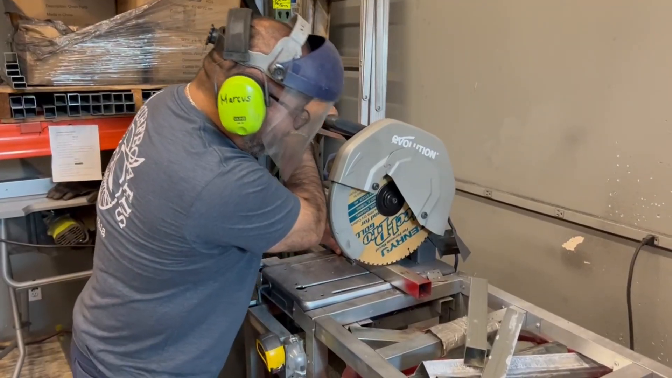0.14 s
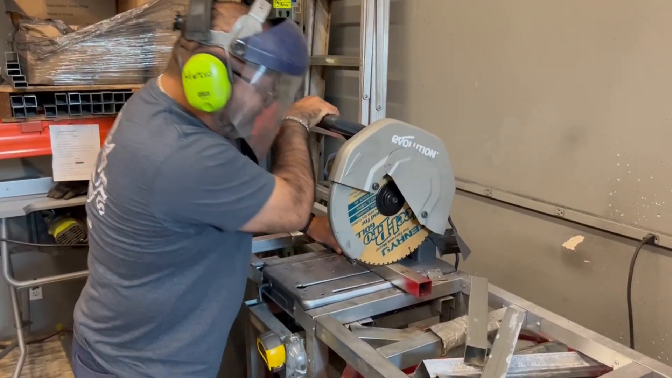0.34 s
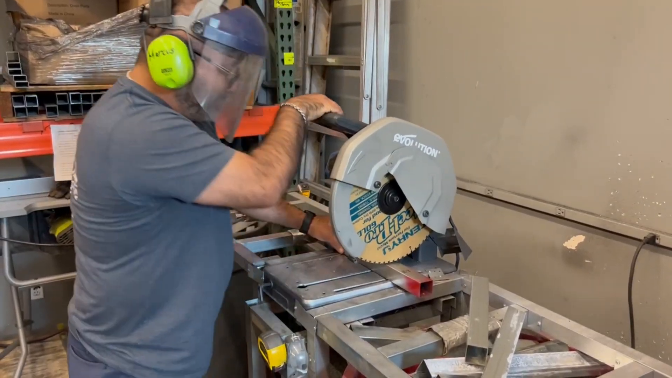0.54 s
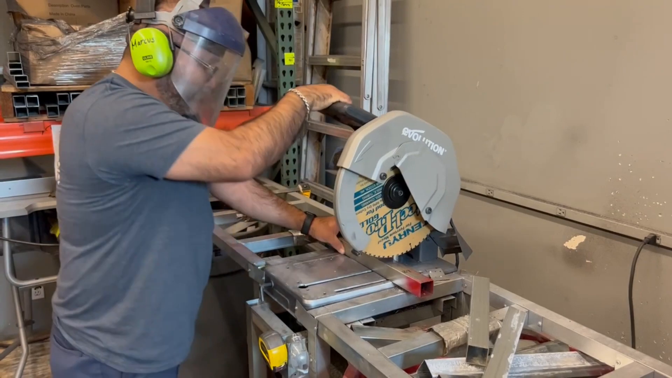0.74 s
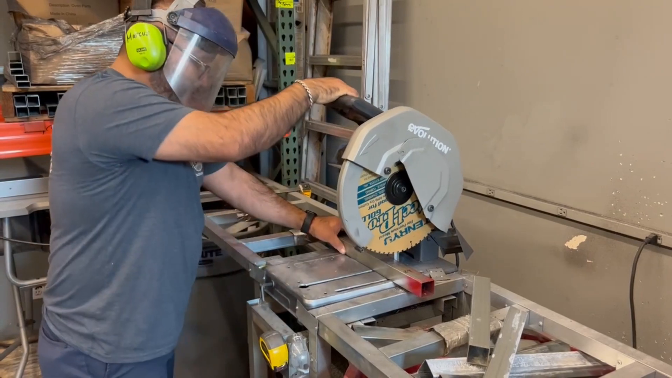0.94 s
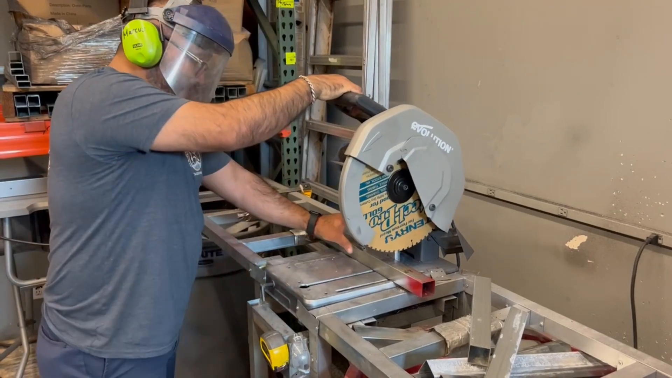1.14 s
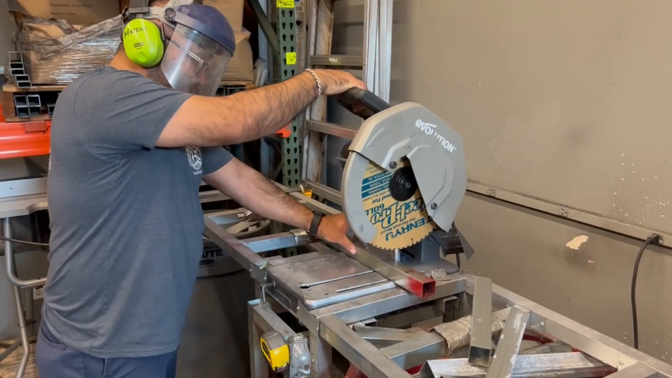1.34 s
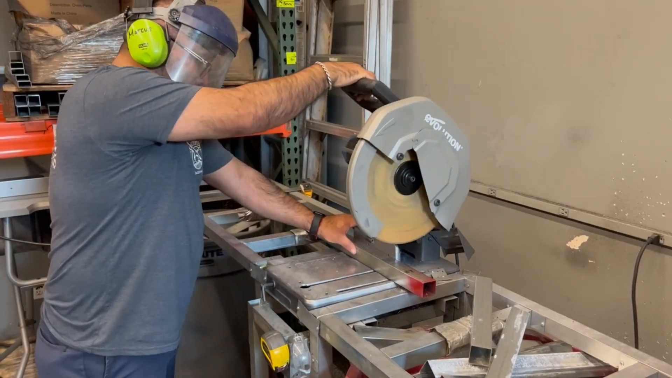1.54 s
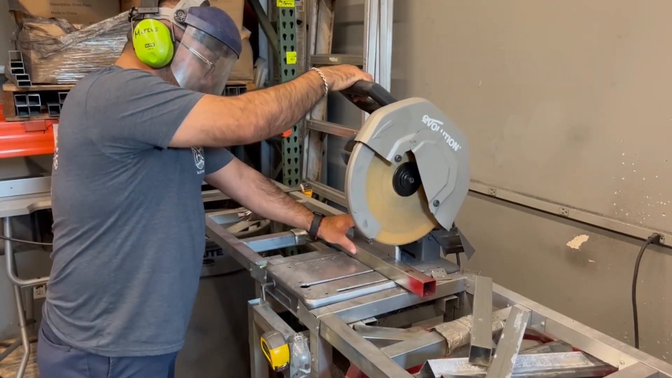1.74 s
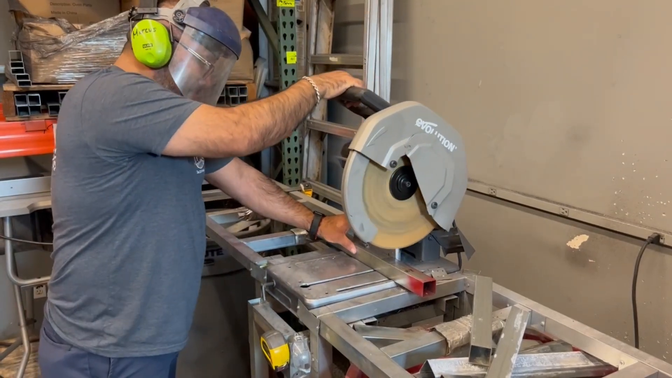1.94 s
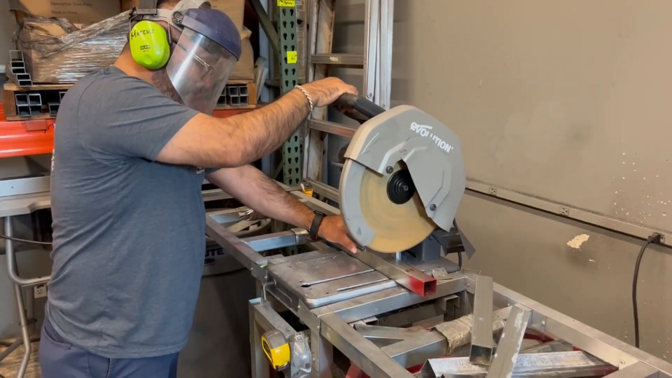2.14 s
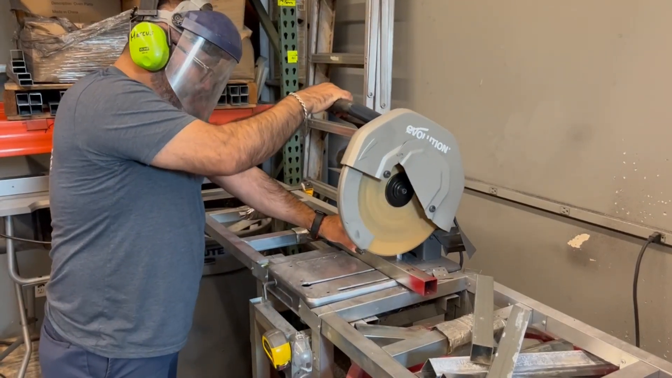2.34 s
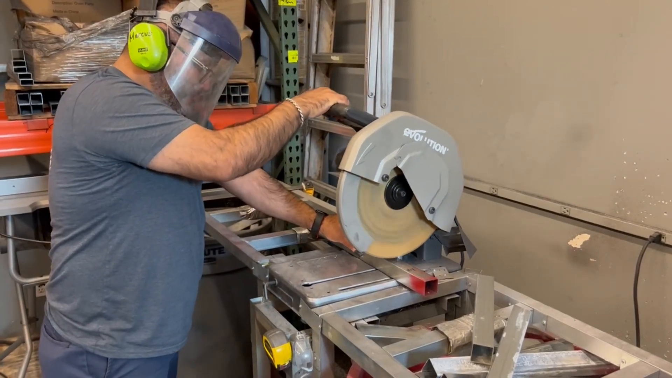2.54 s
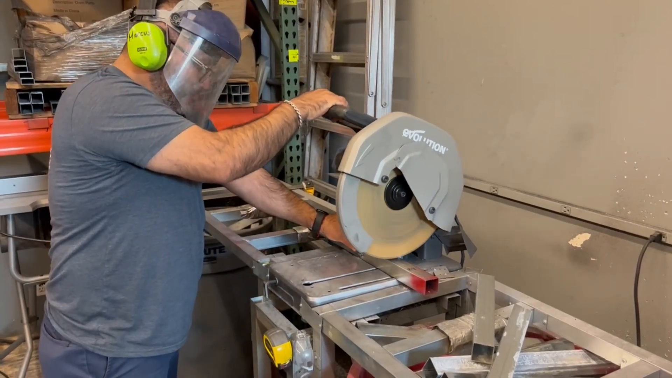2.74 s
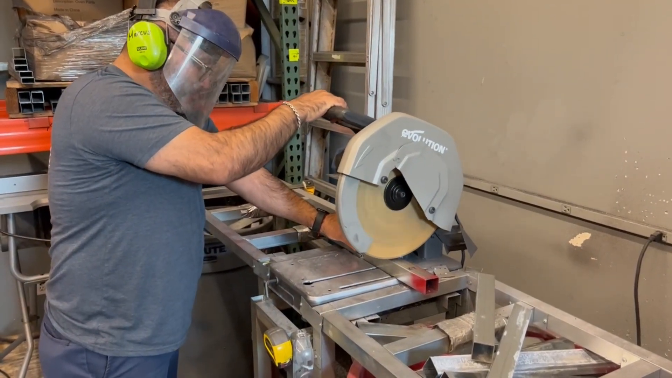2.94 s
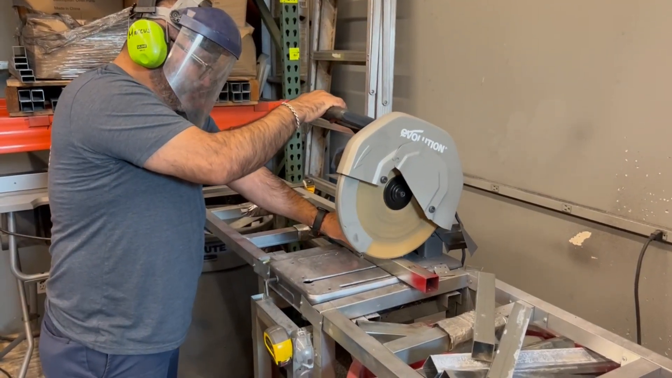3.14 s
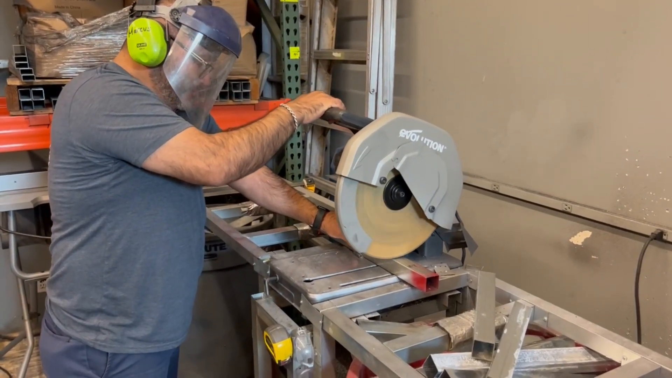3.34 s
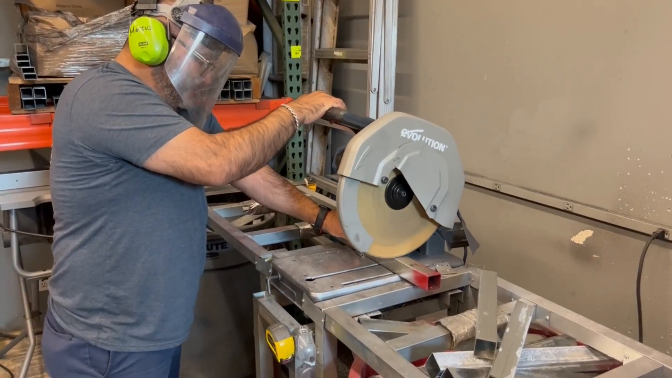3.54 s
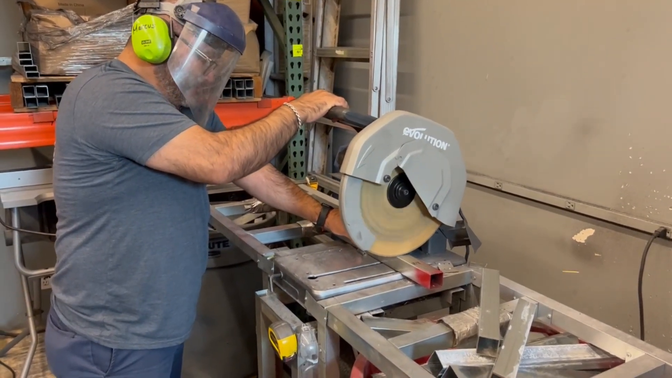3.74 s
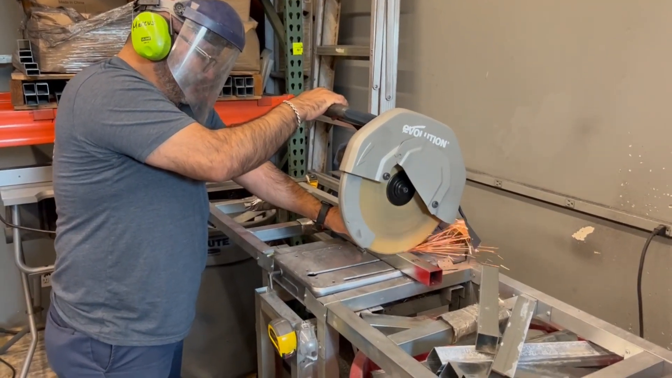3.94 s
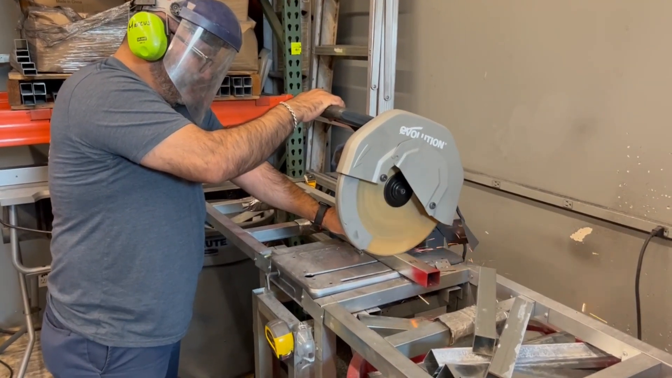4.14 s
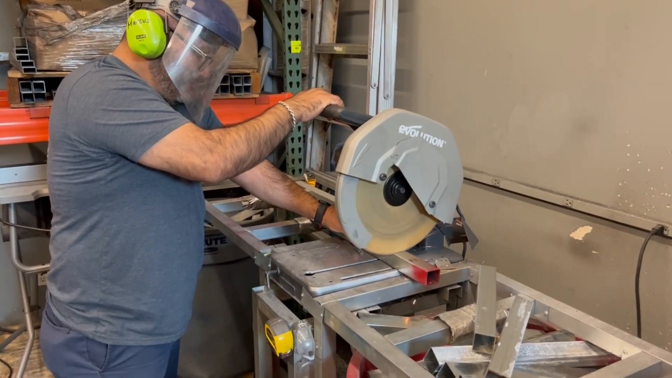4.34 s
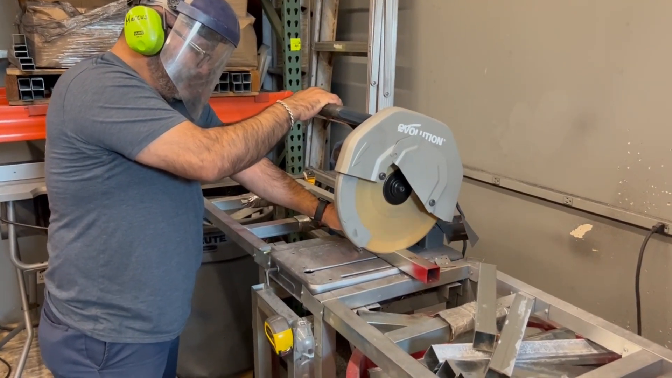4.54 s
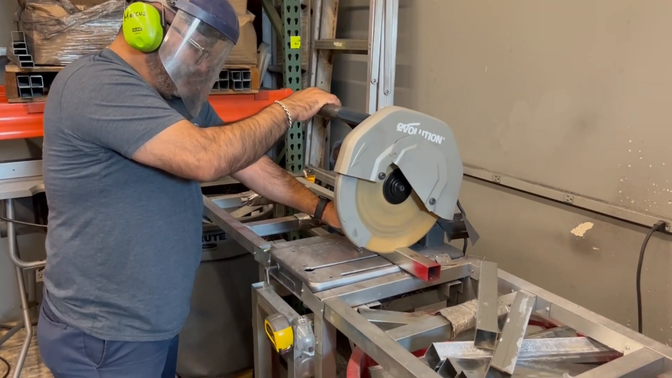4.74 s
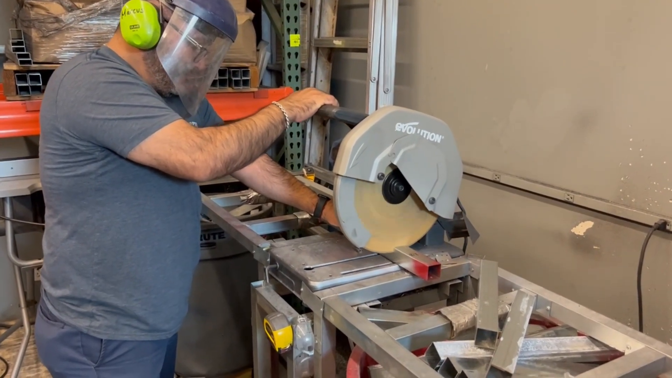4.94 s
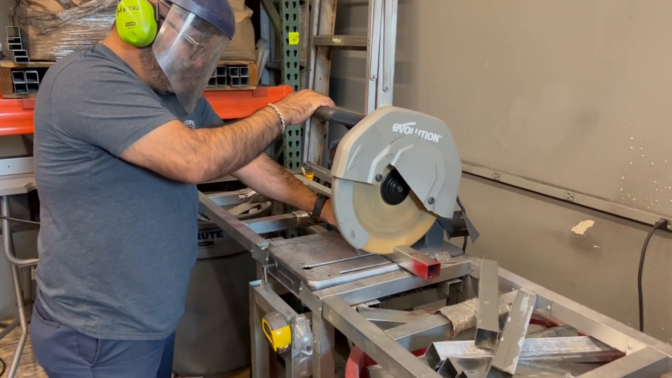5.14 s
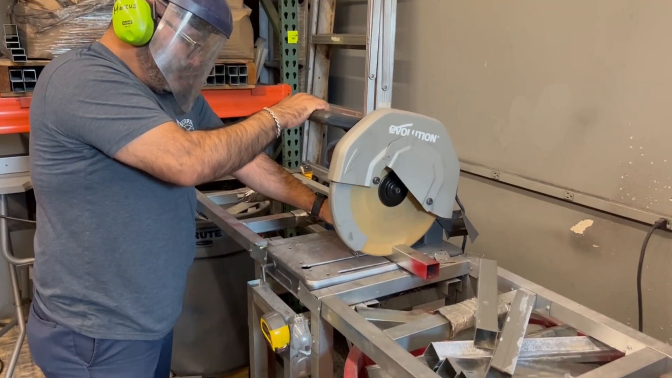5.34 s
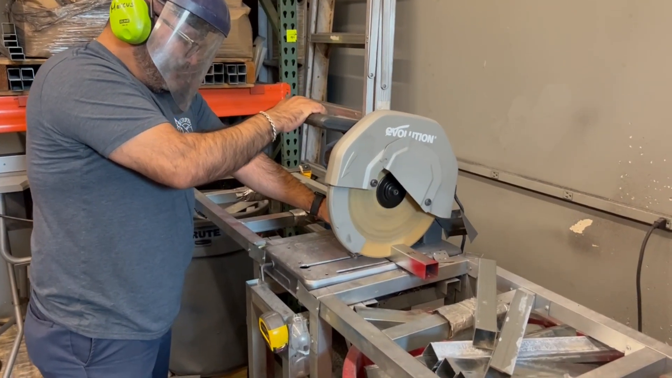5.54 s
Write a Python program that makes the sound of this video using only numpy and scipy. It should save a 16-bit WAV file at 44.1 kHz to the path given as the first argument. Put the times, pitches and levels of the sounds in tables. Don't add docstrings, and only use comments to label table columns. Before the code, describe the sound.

In a workshop, hands rub and knock a bench, a saw motor spins up, its blade screeches through steel, then heavy knocks and a thinner whirring.

```python
import sys
import numpy as np
from scipy import signal
from scipy.fft import rfft, irfft, next_fast_len
from scipy.io import wavfile
from scipy.ndimage import uniform_filter1d

SR = 44100
rng = np.random.default_rng(int(sys.argv[2]) if len(sys.argv) > 2 else 0)


def field_ratio(decibels):
    return 10 ** (np.asarray(decibels, dtype=float) / 20)


def bounce(signal):
    frames = np.transpose(np.atleast_2d(signal))
    limited = np.clip(frames, -1, 1)
    pcm = np.round(limited * 32767).astype(np.int16)
    wavfile.write(sys.argv[1], SR, pcm)


N = 245932
TIME = np.arange(N) / SR
PADDED = next_fast_len(N + 8192)
JOLT_S, BITE_S, THROUGH_S = 1.362, 3.492, 4.872

HUM_DB, ROOM_HUM = -63, [(12, -63), (20, -25), (34, -5), (59, 13), (92, 2.5), (231, -11), (300, -41),
                         (390, -47), (660, -120)]

# t/s, peak level/dB, brightness/dB per octave
TAPS = [(0.134, -48, 15), (0.29, -42.5, 7.5), (0.307, -51, 13), (0.342, -46, 9), (0.543, -29.5, 1.5),
        (0.597, -63, 5), (0.614, -44.5, 7.5), (0.679, -45.5, 4), (0.719, -55, 3), (0.771, -47, 0),
        (0.79, -60, 9), (0.806, -54, -4), (0.838, -46.5, 1), (0.9, -47, 4), (0.949, -39, 8), (1.09, -54, 8),
        (1.282, -49, 4)]
# f/Hz, level/dB, time to fall 60 dB/s
BENCH_MODES = [(392, -7, 0.2), (477, -26, 0.157), (570, -6, 0.06), (649, 0.5, 0.1), (810, -16, 0.13),
               (1171, -13, .08), (1605, -10, 0.047), (2032, -11.5, .04), (3140, -24, .04), (5430, -45, .05)]
TAP_CUT_HZ = 340
TAP_RISE_T60_S, TAP_SPREAD_DB = .025, 3

# start t/s, fullest t/s, level/dB, dying/dB per s, brightness/dB
SCUFFS = [
    (0.0, 0.18, -51, 138, -6.5),
    (0.29, 0.304, -48.5, 97, -12),
    (0.307, 0.3, -53.5, 107, 2),
    (0.335, 0.345, -51, 110, -3.5),
    (0.54, 0.56, -48, 108, -14.5),
    (0.773, 1.02, -53, 100, -13),
    (0.898, 0.95, -42.5, 156, -3),
    (1.06, 1.1, -66, 89.5, -3.5),
    (1.2, 1.2, -71.5, 150, 4.5),
    (1.281, 1.29, -59.5, 151.5, 2),
]
# f/Hz, level/dB, share of brightness, share of dying, floor level/dB
SCUFF_REGISTERS = [(690, 7, 0, 1.04, -84), (2700, 1, 1.5, 1.26, -88), (7900, -8, 1.5, 1.18, -90.5),
                   (12000, -16, 3, 1.6, -100)]
SCUFF_SWELL_DB = 6
# f/Hz, width/Hz, level/dB, hand lets go t/s
CLAMP_MODES = [(980, 65, -13, 1.4), (1470, 130, 2, 1.3), (1920, 200, 1.5, 1.4), (2640, 400, 0, 0.34),
               (2600, 140, 5, 0.34), (2840, 45, -3, .33), (3180, 30, -11, 1.4), (802, 40, -7, 1.4),
               (1180, 40, -3, 1.4)]

# t/s, level/dB, first sweep time/s, dying time/s
KNOCKS = [
    (4.619, -30, 0.00413, 0.027),
    (4.711, -23, 0.0048, 0.02),
    (4.744, -15.5, 0.00236, 0.029),
    (4.757, -17, 0.0027, 0.014),
    (4.785, -16, 0.0017, 0.024),
    (4.799, -15, 0.0021, 0.0089),
    (4.837, -24, 0.00218, 0.022),
    (4.8716, -4.5, 0.00062, 0.02),
]
# t/s, level/dB
RUMBLE = [
    (4.59, -36),
    (4.63, -35),
    (4.682, -51),
    (4.71, -25),
    (4.794, -12),
    (4.904, -29),
    (4.95, -67),
]
SHUDDER_DB = -9
# t/s, level/dB, f/Hz, fullest after/s
SWAY = (4.78, -13, 55, .024)
DUCK_DB, DUCK_RELEASE_S = -12, 0.13

# t/s, level/dB, brightness/dB
ROAR = [(1.349, -63, -7), (1.356, -27.5, 1.5), (1.367, -28.5, 1), (1.457, -25, -9.5), (1.56, -23.5, -10),
        (1.84, -20, -8.5), (2.03, -19, -7), (2.54, -21, -4), (2.79, -22.5, -2.5), (3.48, -23, -2),
        (3.67, -22.5, -1.5), (4.07, -23, 0.5), (4.22, -21.5, 5.5), (4.48, -23, 7), (4.71, -23, 13.5),
        (4.87, -23.5, 9), (5.05, -26, 14), (5.58, -29.5, 14)]
# f/Hz, level/dB
ROAR_SHAPE = [(40, -36), (90, -10.5), (180, -14), (350, 0.5), (700, 0.5), (1500, -1.5), (3000, -3),
              (6000, -3.5), (9000, -3.5)]
# f/Hz, level/dB, share of brightness, level added by chips/dB
REGISTERS = [(340, 3.5, -0.32, 0), (1176, 11, -0.61, -0.1), (3990, 11, -0.15, 2.5), (6870, 7.5, 0.32, -0.2),
             (12000, -14.5, 0.57, 3.5)]
# f/Hz, width/Hz, level/dB
HOUSING = [(615.8, 16, 4.5), (840, 97, -10.5), (1587, 15, -0.5), (1941, 31, -3.5)]
LOW_LAG_DB, LOW_LAG_S = -10, .25
TOP_LOST_DB, TOP_LOST_S = -19, 0.046
SPLIT_HZ, SPLIT_WIDTH_HZ, TOP_TILT_DB_PER_OCT = 11000, 250, -10

# f/Hz, width/Hz, level/dB, time to fall 60 dB/s
JOLT = [(119.2, 2.84, -31, 1.2), (374, 38, -24.5, 0.46), (440, 55, -23.5, 4.3), (597, 22, -25.5, 1.9),
        (806, 110, -28.5, 0.78), (2140, 44, -35, 1.4), (4840, 230, -23, 0.35)]
# f/Hz, width/Hz, level/dB, t/s, lasting time/s
RATTLES = [
    (2130, 110, -26, 1.47, 0.026),
    (3380, 220, -23, 1.98, 0.028),
    (1750, 130, -25, 1.57, .03),
    (3020, 710, -23.5, 2.16, 0.17),
    (2960, 510, -26, 2.52, 0.12),
]
# t/s, once a turn level/dB, twice a turn level/dB
ROTOR = [
    (1.5, -43, -44),
    (1.8, -41.5, -64.5),
    (2.5, -33.5, -50),
    (3.2, -36.5, -34),
    (3.9, -36.5, -34),
    (4.5, -43, -72),
    (4.86, -50, -65),
    (4.9, -43.5, -47.5),
    (5.58, -43, -57),
]
# multiple of the rotor, level/dB, loudest t/s, lasting time/s
GEAR = (20.7, -30, 1.555, .03)
# t/s, blade rate f/Hz, tone level/dB
FAN = [(1.36, 1306, -57), (1.5, 2094, -25), (1.55, 2435, -33), (1.59, 2693, -31), (1.68, 3090, -33),
       (1.705, 3189, -24.5), (1.8, 3464, -23.5), (1.85, 3586, -29), (1.91, 3740, -23.5), (1.99, 3873, -29),
       (2.06, 3960, -24.5), (2.12, 4065, -29), (2.2, 4174, -25.5), (2.35, 4293, -20), (2.6, 4510, -29),
       (2.85, 4644, -24), (3.22, 4766, -22), (3.3, 4785, -34), (3.5, 4856, -37), (3.915, 4793, -35),
       (3.95, 4793, -23.5), (4.14, 4700, -24), (4.45, 4604, -32), (4.86, 4653, -35)]
# t/s, beat rate f/Hz
BEAT = [(1.36, 70), (2.0, 55), (2.35, 33), (2.6, 24), (2.81, 16.5), (2.88, 12.5), (2.97, 11), (3.06, 10)]
BEAT_S, BEAT_DB, FAN_FREED_DB = 3.11, 4, -16
NULL_HZ, NULL_WIDTH_HZ, NULL_DB = 3810, 35, -9
WHINE_ROUGH_DB, WHINE_CLEARS_DB_PER_S = -1, 8
WHINE_TWICE_DB = -15
WHINE_BURIED_DB, WHINE_EMERGES_S = -11, .2

# f/Hz, width/Hz, level/dB, loudest t/s, lasting time/s
SINGING = [(684, 2.5, -29.5, 3.82, 0.096), (690, 2.5, -24.5, 4.08, 0.048), (680, 2.5, -27.5, 4.22, 0.092),
           (686, 2.5, -37.5, 4.4, 0.15), (1460, 3.3, -23.5, 3.93, 0.075), (1457, 3.3, -24.5, 4.14, 0.042),
           (1453, 3.3, -27, 4.32, 0.053), (1463, 3, -35, 4.55, 0.16), (2070, 5.1, -29.5, 4.38, 0.099),
           (2370, 4.1, -30.5, 4.18, 0.14), (2450, 12, -33, 3.85, 0.14), (2480, 21, -45, 3.54, 0.24),
           (1680, 8.7, -27, 4.155, 0.21), (3725, 28, -31, 4.2, 0.24), (4120, 30, -26, 4.06, 0.045),
           (4900, 11.4, -32, 4.64, 0.158), (5180, 20, -30.5, 4.25, 0.275), (4510, 10, -29, 4.58, 0.062),
           (5418, 11, -30.5, 4.46, 0.66), (5520, 71, -27, 4.18, 0.17), (6950, 15.3, -33, 4.16, 0.17),
           (6660, 30.6, -46, 4.8, 0.17), (7000, 39, -28.5, 4.24, 0.19), (8060, 28, -43, 4.5, 0.18),
           (8777, 25, -29.5, 4.262, 0.19)]
# t/s, pair rate f/Hz
PAIR_RATE = [(3.492, 822), (3.7, 822.5), (4.0, 811), (4.12, 799), (4.25, 796), (4.4, 790.8), (4.55, 791.4),
             (4.7, 794.4), (4.85, 797.3), (5.0, 799.2), (5.15, 800.2), (5.58, 800.5)]
# t/s, share of pitch
WANDER = [(3.47, .004), (4.1, .004), (4.4, .0015), (4.9, .0003), (5.58, .0003)]
# multiple of the pair rate, level/dB
TEETH = [(1, -40), (2, -42.5), (3, -37.5), (4, -33.5), (5, -33.5), (6, -32.5), (7, -35.5), (8, -33.5),
         (9, -41), (10, -33), (11, -40.5), (12, -31.5), (13, -39), (14, -34.5), (16, -40), (18, -45)]
# t/s, even multiples level/dB, their brightness/dB per octave, odd multiples level/dB
CUT = [
    (3.492, 0, -22, 5.5),
    (3.6, 0.5, -5, 0),
    (3.78, 3, -7, 4),
    (4.1, -2.5, -1, 3),
    (4.35, 5.5, -15, -1.5),
    (4.55, -5, 7.5, -6),
    (4.8, 3.5, 7, -7),
    (5.05, 0.5, 6, -28),
    (5.58, -1.5, 5.5, -19),
]
# multiple of the pair rate, level/dB, loudest t/s, lasting time/s
SQUEALS = [(2, -31, 3.9, 0.045), (4, -33, 4.05, 0.12), (2, -39, 3.9, 0.1), (4, -31.5, 4.31, 0.094),
           (2, -31, 4.35, 0.05), (4, -32, 4.56, 0.1), (14, -29, 4.55, 0.072), (6, -38, 4.7, 0.13),
           (10, -31, 4.74, 0.054), (4, -38, 4.85, 0.028), (6, -25, 5.186, 0.19), (5, -34, 3.505, 0.022),
           (5, -34, 3.57, 0.04), (5, -35, 3.72, 0.053), (5, -35, 4.05, 0.06), (7, -33.5, 3.5, 0.012),
           (6, -35, 4.48, 0.15), (8, -31, 5.49, 0.06), (8, -35, 5.02, 0.048), (8, -34, 5.25, .07),
           (4, -40, 5.14, .06), (4, -41, 5.3, .05), (10, -29.5, 5.2, 0.14), (12, -36, 5.04, 0.052),
           (12, -28, 4.45, 0.16), (4, -30, 3.53, 0.038), (2, -30, 5.225, 0.087), (4, -37, 5.52, 0.08)]
HIGH_TEETH_LOST_DB = -23.5
# most at t/s, lasting time/s, sharpness, gained level/dB
HIGH_TOOTH = (3.84, .26, 1.2, 4.5)
BEADED = {4: 1.6, 5: 0, 7: .3}
# t/s, depth 0-1
THROB = [(3.49, 0.56), (4.0, 0.37), (4.3, 0.21), (4.6, 0.4), (4.9, 0.27), (5.58, 0.21)]
THROB_TOP = 5

# f/Hz, likeness 0-1
LIKENESS = [(60, .99), (240, .95), (480, .88), (950, .66), (1900, .72), (3800, .45), (6500, .8), (8400, .9),
            (15000, .97)]
# f/Hz, lead/rad
LEAD = [(100, -0.026), (1980, 0.44), (3100, 0.83), (3960, 0.56), (4650, 0.79), (6500, 0.95)]
# f/Hz, lead/rad
TREBLE_LEAD = [(8400, 0), (10200, -3.14), (12000, -6.28), (13750, -9.42), (15500, -12.57), (17000, -15.2)]
# f/Hz, level/dB
LOUDER = [(60, 0), (120, -0.5), (240, 0.5), (480, -0.5), (950, -3), (1890, -1.0), (3770, 3), (7520, 0.0),
          (15000, -2.5)]
SHOP_T60_S, SHOP_DB = .35, -11.5
# t/s, f/Hz, level/dB
BASS_CUT = (5.085, 900, -10)
# from f/Hz, swing/Hz, to f/Hz, swing/Hz
TREBLE_GAPS = [
    [(9760, 60, 10650, 220), (13050, 220, 14400, 250), (15900, 100, 30000, 0)],
    [(8350, 350, 8600, 250), (11550, 150, 12800, 330), (14950, 220, 30000, 0)],
]
GAP_BAND_HZ, STRAY_GAPS, STRAY_KEPT = 172, .13, .05
GIVEN_UP_HZ = 9740
KEPT_HZ = [11200, 12800]
# f/Hz, share of the time
SOMETIMES_KEPT = (14400, .45)


def rms_one(x):
    return x / np.sqrt(np.mean(x ** 2) + 1e-20)


def in_time(rows, before=-120.):
    s, *columns = np.transpose(rows)
    return np.array([np.interp(TIME, s, c, left=before) for c in columns])


def at_hz(points, hz):
    points = np.array(points)
    return np.interp(np.log(hz), np.log(points[:, 0]), points[:, 1])


def drift(rate):
    r = np.exp(-80 * np.pi * rate / SR)
    slow = signal.lfilter([1], [1, -2 * r, r * r], rng.standard_normal(N // 40 + 2002))[2000:]
    return np.interp(np.arange(N) / 40, np.arange(len(slow)), rms_one(slow))


def resonance(x, hz, width_hz):
    r = np.exp(-np.pi * width_hz / SR)
    turn = -2 * r * np.cos(2 * np.pi * hz / SR)
    return signal.lfilter([(1 - r * r) / 2, 0, (r * r - 1) / 2], [1, turn, r * r], x)


def ring(clicks, hz, t60):
    r, w = field_ratio(-60 / (t60 * SR)), 2 * np.pi * hz / SR
    return signal.lfilter([0, np.sin(w)], [1, -2 * r * np.cos(w), r * r], clicks + 1e-18)


def bump(at, lasts):
    return np.exp(-((TIME - at) / lasts) ** 2)


def high_pass(x, order, hz):
    return signal.sosfilt(signal.butter(order, hz, "high", fs=SR, output="sos"), x)


def banded(curves_db, curve_hz, shape, patchy_db):
    out, together, edges = 0, drift(5), 40 * 2 ** np.arange(0, 8.6, .5)
    white = rng.standard_normal((2, 2, N))
    index = np.arange(len(curve_hz))
    for k, (low, high) in enumerate(zip(edges, edges[1:])):
        hz = np.sqrt(low * high)
        place = np.interp(np.log(hz), np.log(curve_hz), index)
        shares = np.maximum(1 - abs(place - index), 0)
        flicker_db = patchy_db * (0.11 * together + drift(9.3))
        gain = field_ratio(shares @ curves_db + at_hz(shape, hz) + flicker_db)
        band = signal.butter(2, [low, high], "band", fs=SR, output="sos")
        out = out + gain * signal.sosfilt(band, white[k % 2])
    return out


def tone(phase, level_db, flicker_db, rate):
    strength = np.sqrt(2) * field_ratio(level_db + flicker_db * drift(rate))
    return strength * np.sin(phase + rng.uniform(0, 2 * np.pi))


def duck_db():
    return DUCK_DB * np.exp(-np.maximum(TIME - THROUGH_S, 0) / DUCK_RELEASE_S) * (TIME > THROUGH_S)


def room_rumble():
    hz = np.maximum(np.arange(N // 2 + 1) * SR / N, 1)
    return field_ratio(HUM_DB) * rms_one(irfft(rfft(rng.standard_normal(N)) * field_ratio(at_hz(ROOM_HUM, hz)), N))


def bench_taps():
    at_s, peak_db, bright_db = np.transpose(TAPS)
    at, taps = np.round(at_s * SR).astype(int), np.zeros(N)
    for hz, db, t60 in BENCH_MODES:
        clicks = np.zeros(N)
        chance_db = rng.normal(0, TAP_SPREAD_DB, len(at))
        clicks[at] = field_ratio(peak_db + db - 8.0 + bright_db * np.log2(hz / 700) + chance_db)
        taps += ring(clicks, hz, t60) - ring(clicks, hz, min(TAP_RISE_T60_S, t60 / 3))
    return high_pass(taps, 4, TAP_CUT_HZ)


def scuff_db():
    _, db, share, dying, out = np.transpose(SCUFF_REGISTERS)[:, :, None]
    for start, fullest, peak_db, dies, bright_db in SCUFFS:
        swell = SCUFF_SWELL_DB * np.minimum((TIME - fullest) / max(fullest - start, .002), 0)
        level = peak_db + share * bright_db + swell - dying * dies * np.maximum(TIME - fullest, 0)
        out = np.maximum(out, np.where(TIME >= start, level, -120))
    return out + db


def scuffs():
    shape = [(150, -7), (350, -.5), (8000, 8), (9500, 6), (11000, 1)]   # f/Hz, level/dB
    scuff = banded(scuff_db()[:-1], np.transpose(SCUFF_REGISTERS)[0, :-1], shape, patchy_db=2.4)
    clamp = 0
    for hz, width, db, until in CLAMP_MODES:
        held = np.clip((until - TIME) / .05, 0, 1)
        clamp = clamp + field_ratio(db + 6.0) * resonance(scuff, hz, width) * held
    return scuff + clamp


def mount():
    at, db, hz, fullest = SWAY
    t = np.maximum(TIME - at, 0)
    out = field_ratio(db) * (t / fullest * np.exp(1 - t / fullest)) ** 2 * np.sin(2 * np.pi * hz * t)
    for at, db, first, dies in KNOCKS:
        t = np.maximum(TIME - at, 0)
        sweep = np.sin(2 * np.pi * 1.21 * np.log(1 + t / first))
        out += field_ratio(db) * sweep * (1 + t / first) ** -.35 * np.exp(-t / dies)
    shudder = resonance(rng.standard_normal((2, N)), 79.0, 43)
    level = field_ratio(in_time([*RUMBLE, (5.0, -92)])[0] + SHUDDER_DB)
    return out * field_ratio([[.6], [-.6]]) + level * rms_one(shudder[0] + shudder[1] * [[.3], [-.3]])


def roar_db():
    level_db, bright_db = in_time(ROAR)
    _, db, share, chips_db = np.transpose(REGISTERS)[:, :, None]
    cutting = (TIME > BITE_S) & (TIME < THROUGH_S)
    out = level_db + duck_db() + db + share * bright_db.clip(-15, 25) + chips_db * cutting
    out[0] += LOW_LAG_DB * np.exp(-np.maximum(TIME - JOLT_S, 0) / LOW_LAG_S)
    out[-1] += TOP_LOST_DB * np.clip((TIME - THROUGH_S) / TOP_LOST_S - .4, 0, 1)
    return out


def air_roar():
    roar = banded(roar_db()[:-1], np.transpose(REGISTERS)[0, :-1], ROAR_SHAPE, patchy_db=1.06)
    return roar + sum(field_ratio(db + 2) * resonance(roar, hz, width) for hz, width, db in HOUSING)


def above_split(size):
    hz = np.arange(size // 2 + 1) * SR / size
    return .5 + .5 * np.tanh((hz - SPLIT_HZ) / SPLIT_WIDTH_HZ)


def with_top(noise):
    hz = np.arange(N // 2 + 1) * SR / N
    tilt = field_ratio(TOP_TILT_DB_PER_OCT * np.log2(np.maximum(hz, 1) / 12500))
    top = irfft(rfft(rng.standard_normal((2, N))) * np.sqrt(above_split(N)) * tilt, N)
    level = field_ratio(np.maximum(roar_db()[-1], scuff_db()[-1]) + 9.0 + 2.0 * drift(21))
    under = np.sqrt(1 - above_split(PADDED))
    return irfft(rfft(noise, PADDED) * under, PADDED)[:, :N] + level * top


def frame_jolt_and_rattles():
    out, shake = 0, rng.standard_normal(N)
    since = np.maximum(TIME - JOLT_S, 0)
    for hz, width, db, t60 in JOLT:
        fading = field_ratio(db - 60 * since / t60) * np.minimum(since / 0.015, 1)
        out = out + fading * rms_one(resonance(shake, hz, width))
    for hz, width, db, at, lasts in RATTLES:
        out = out + field_ratio(db) * bump(at, lasts) * rms_one(resonance(shake, hz, width))
    return out


def rotor(turns):
    once_db, twice_db = in_time(ROTOR)
    multiple, db, at, lasts = GEAR
    hum = tone(turns, once_db, 3.2, 12) + tone(2 * turns, twice_db, 5.1, 3.5)
    return hum + bump(at, lasts) * tone(multiple * turns, db, 2, 30)


def fan_whine(turns, blade_hz, fan_db):
    since = np.maximum(TIME - JOLT_S, 0)
    beats = np.cumsum(in_time(BEAT)[0].clip(0)) / SR
    beating = np.cos(2 * np.pi * (beats - beats[round(BEAT_S * SR)]))
    fan_db = fan_db + BEAT_DB * beating + FAN_FREED_DB * (TIME > THROUGH_S)
    fan_db = fan_db + NULL_DB * np.exp(-((blade_hz - NULL_HZ) / NULL_WIDTH_HZ) ** 2)
    clean = tone(12 * turns, fan_db + WHINE_BURIED_DB * np.exp(-since / WHINE_EMERGES_S), 2.2, 40)
    rough = tone(12 * turns, fan_db + WHINE_ROUGH_DB - WHINE_CLEARS_DB_PER_S * since, 2, 20)
    return clean + drift(90) * rough + tone(24 * turns, fan_db + WHINE_TWICE_DB, 3, 30)


def motor():
    blade_hz, fan_db = in_time(FAN)
    smooth_hz = np.maximum(uniform_filter1d(blade_hz, size=2000), 0)
    turns = 2 * np.pi * np.cumsum(smooth_hz * (1 + .002 * drift(60))) / SR / 12
    return rotor(turns) + fan_whine(turns, blade_hz, fan_db) + frame_jolt_and_rattles()


def blade_turn():
    return 2 * np.pi * np.cumsum(in_time(PAIR_RATE)[0].clip(0)) / SR / 35.3 - 2.1


def wobble():
    return 1 + in_time(THROB)[0].clip(0, 1) * np.cos(blade_turn())


def singing():
    out, shake = 0, rng.standard_normal(N)
    for hz, width, db, at, lasts in SINGING:
        if width < 6:
            voice = tone(2 * np.pi * hz * TIME, 0, 1.5, 15)
        else:
            voice = rms_one(resonance(shake, hz, width))
        out = out + field_ratio(db) * bump(at, lasts) * (TIME > BITE_S) * voice
    return out * np.where(TIME > KNOCKS[-1][0], field_ratio(-15), 1)


def teeth():
    pair_hz, (even_db, bright_db, odd_db) = in_time(PAIR_RATE)[0], in_time(CUT)
    wander = in_time(WANDER)[0].clip(0)
    phase = 2 * np.pi * np.cumsum(np.maximum(pair_hz, 0) * (1 + wander * drift(22.8))) / SR
    most_at, proud_lasts, sharp, gained_db = HIGH_TOOTH
    share = np.exp(-((TIME - most_at) / proud_lasts) ** 4)
    out, turn, throb = 0, blade_turn(), wobble()
    bitten = np.clip((TIME - BITE_S) / .004, 0, 1)
    for k, db in TEETH:
        k = round(k)
        cut_db = odd_db if k % 2 else even_db + bright_db * max(np.log2(k / 6), 0)
        level = field_ratio(db + cut_db)
        for multiple, squeal_db, at, lasts in SQUEALS:
            if round(multiple) == k:
                level = level + field_ratio(squeal_db) * np.exp(-abs((TIME - at) / lasts) ** 3)
        if k in BEADED:
            bead = field_ratio(gained_db) * np.exp(sharp * (np.cos(turn - BEADED[k]) - 1))
            level = level * (1 - share + share * bead)
        level = level * (throb if k <= THROB_TOP else throb ** .3)
        lost_db = HIGH_TEETH_LOST_DB * (k > 13) * (TIME > THROUGH_S)
        out = out + bitten * level * tone(k * phase, duck_db() + lost_db, 1.8, 18)
    return out


def ports(direct, diffuse):
    hz = np.maximum(np.arange(PADDED // 2 + 1) * SR / PADDED, 1)
    alike = np.clip(at_hz(LIKENESS, hz), 0, 1)
    shared, unlike = rfft(diffuse, PADDED)
    mid = rfft(direct, PADDED) + np.sqrt((1 + alike) / 2) * shared
    side = np.sqrt((1 - alike) / 2) * unlike
    half = field_ratio(at_hz(LOUDER, hz) / 2) * np.exp(.5j * at_hz([*LEAD, *TREBLE_LEAD], hz))
    return irfft(np.array([(mid + side) * half, (mid - side) / half]), PADDED)[:, :N]


def shop(x, t60, wet_db):
    t = np.arange(SR // 2) / SR
    tail = rng.standard_normal((2, len(t))) * field_ratio(-60 * t / t60) * (t > .006)
    tail = tail / np.sqrt(np.sum(tail[0] ** 2))
    return field_ratio(wet_db) * signal.fftconvolve(x[None], tail, axes=1)[:, :N]


def scene():
    direct = room_rumble() + bench_taps() + motor() + wobble() ** 0.54 * singing() + teeth()
    noise = with_top(scuffs() + air_roar() * wobble() ** 0.061)
    return ports(direct, noise) + shop(direct, SHOP_T60_S, SHOP_DB) + mount()


def treble_gaps(x):
    sum_diff = np.roll([x[0] + x[1], x[0] - x[1]], -221, axis=1) / 2
    hz, frames, z = signal.stft(sum_diff, SR, nperseg=2048)
    tall_hz = hz[:, None]
    band = np.round(hz / GAP_BAND_HZ).astype(int)[:, None]
    band_hz = band * GAP_BAND_HZ
    luck = rng.random((2, band.max() + 1, len(frames) // 2 + 1)).repeat(2, axis=2)
    luck = luck[:, band[:, 0], :len(frames)]
    kept = (luck > STRAY_GAPS) | (tall_hz < SPLIT_HZ)
    for channel, gaps in enumerate(TREBLE_GAPS):
        for low, low_swing, high, high_swing in gaps:
            sway = uniform_filter1d(rng.standard_normal((2, len(frames))), size=2) * 1.4
            below = band_hz < np.minimum(low + low_swing * sway[0], 15800)
            kept[channel] &= below | (band_hz > high + high_swing * sway[1])
    spared = (hz < GIVEN_UP_HZ) | (abs(tall_hz - KEPT_HZ).min(axis=1) < 60)
    tone_hz, tone_share = SOMETIMES_KEPT
    lucky = luck < tone_share + np.array([[[0]], [[.4]]])
    spared = spared[:, None] | (abs(tall_hz - tone_hz) < 60) & lucky
    stray = (luck < STRAY_KEPT * np.where(tall_hz > SPLIT_HZ, 1, .3)) & (tall_hz < 15800)
    kept = np.where(frames > THROUGH_S + .04, spared | stray, kept)
    mid, side = np.roll(signal.istft(z * kept, SR, nperseg=2048)[1][:, :N], 221, axis=1)
    return np.array([mid + side, mid - side])


def roll_off(x):
    return signal.sosfilt(signal.butter(12, 16830, fs=SR, output="sos"), x)


def record(dry):
    heard = high_pass(dry, 2, 32)
    at, hz, db = BASS_CUT
    bass = signal.sosfiltfilt(signal.butter(2, hz, fs=SR, output="sos"), heard)
    heard = heard - bass * (1 - field_ratio(db)) * np.clip((TIME - at) / 0.012, 0, 1)
    heard = 1.6 * np.tanh(heard / 1.6)
    mix = treble_gaps(heard)
    return roll_off(mix)


dry = scene()
out = record(dry)
bounce(out)
```